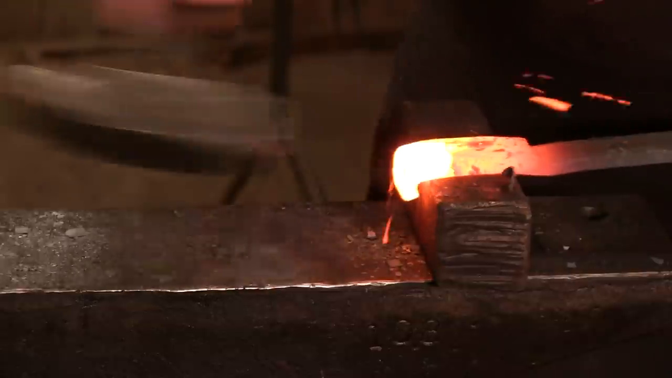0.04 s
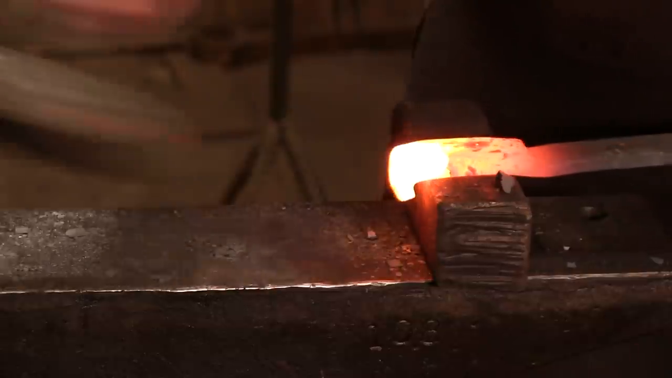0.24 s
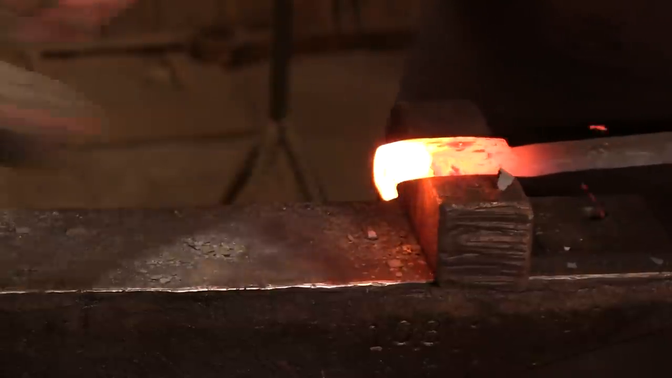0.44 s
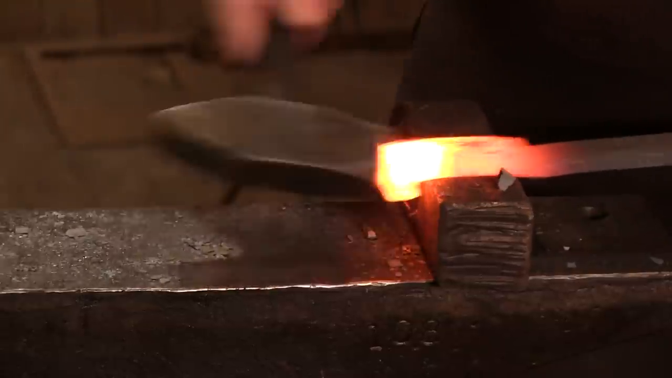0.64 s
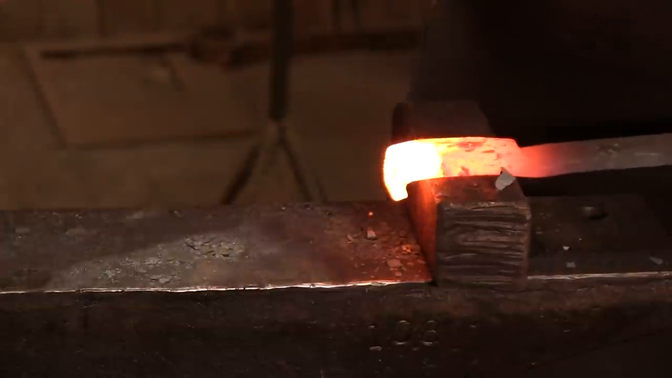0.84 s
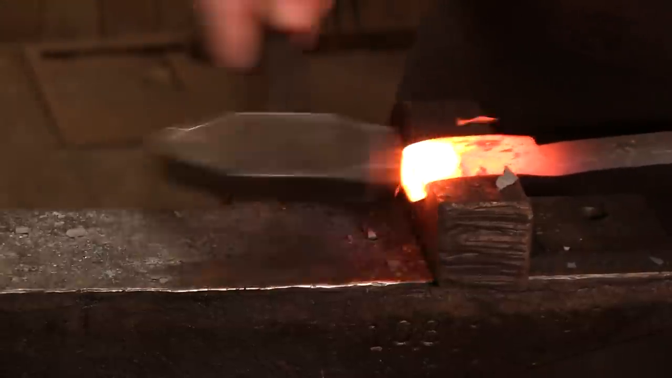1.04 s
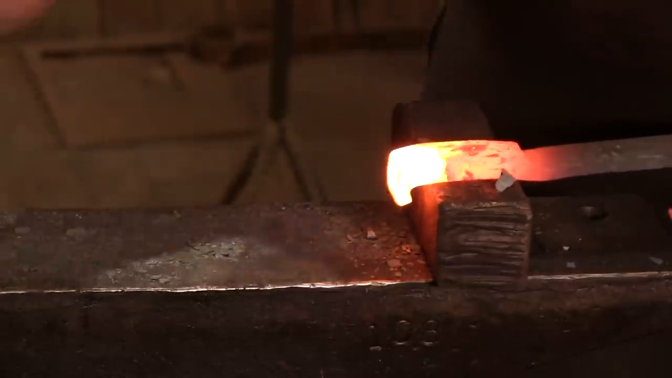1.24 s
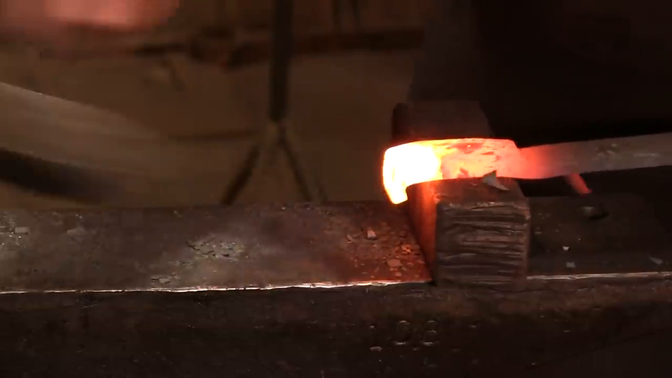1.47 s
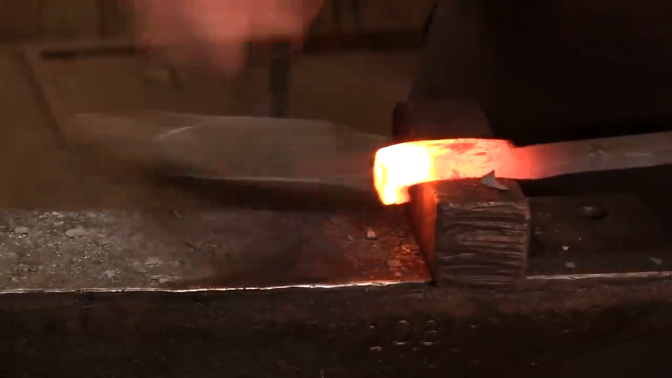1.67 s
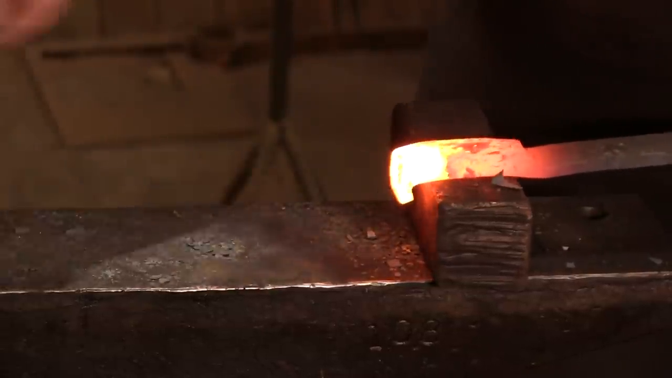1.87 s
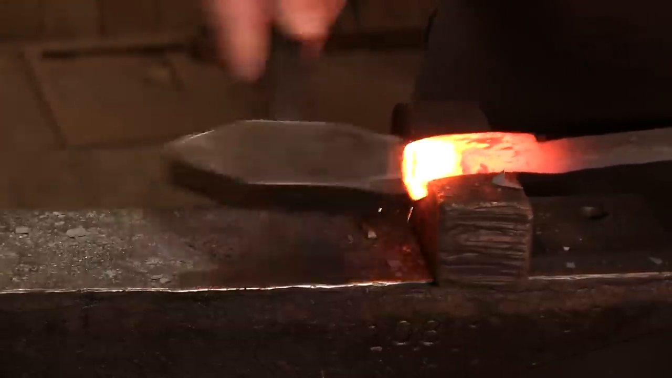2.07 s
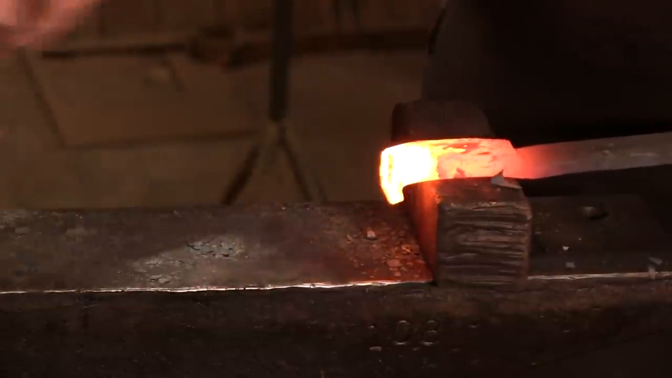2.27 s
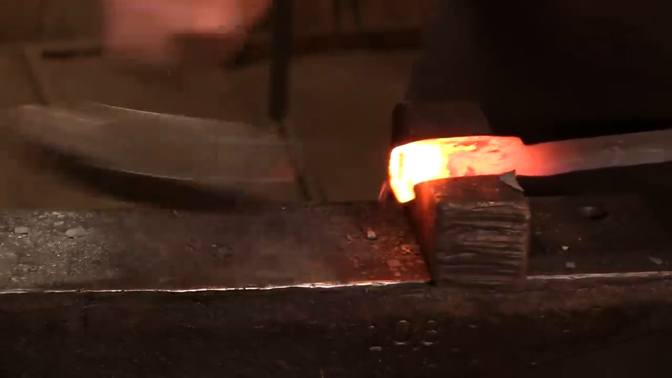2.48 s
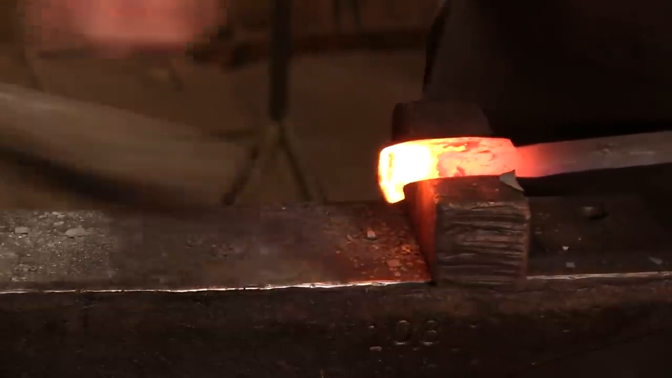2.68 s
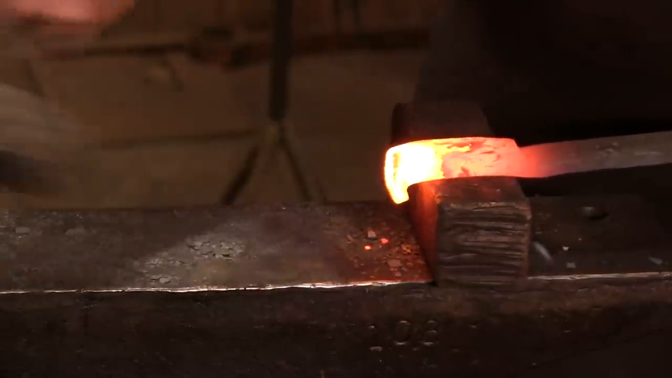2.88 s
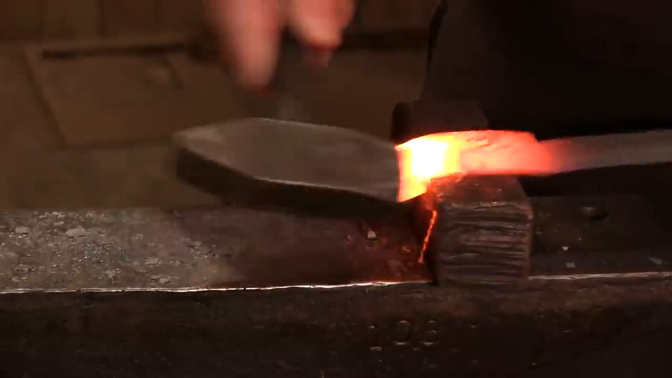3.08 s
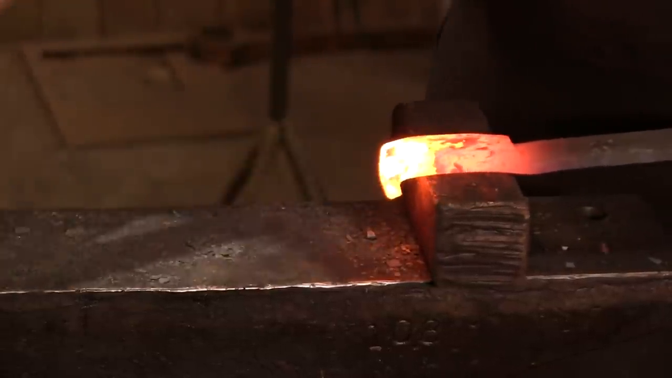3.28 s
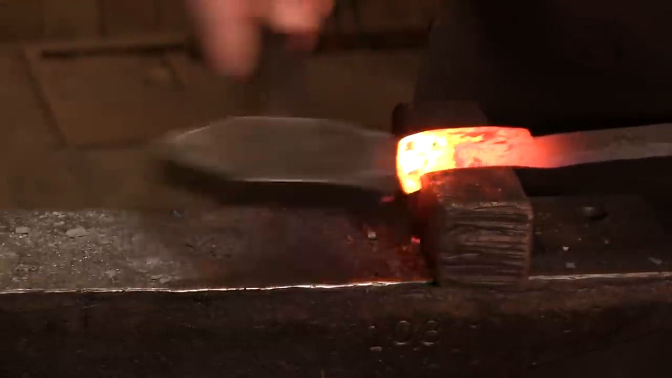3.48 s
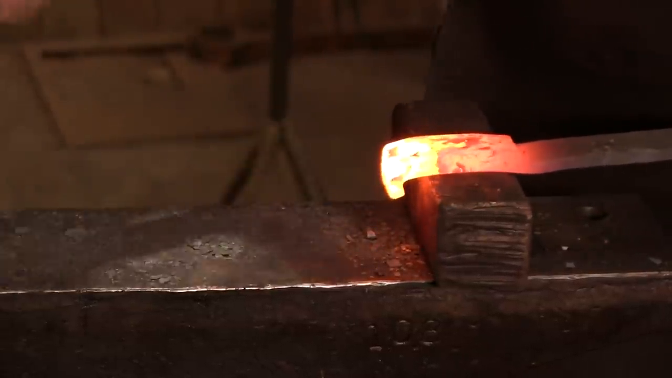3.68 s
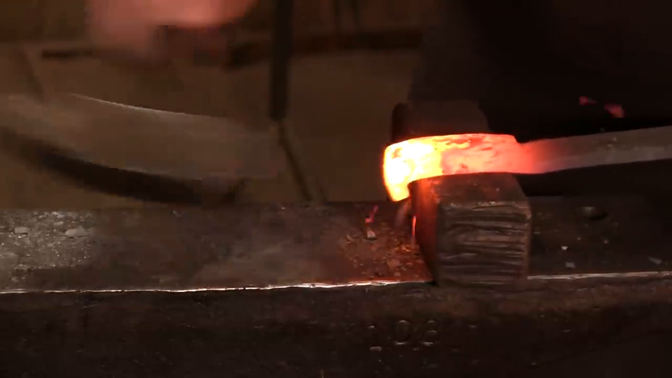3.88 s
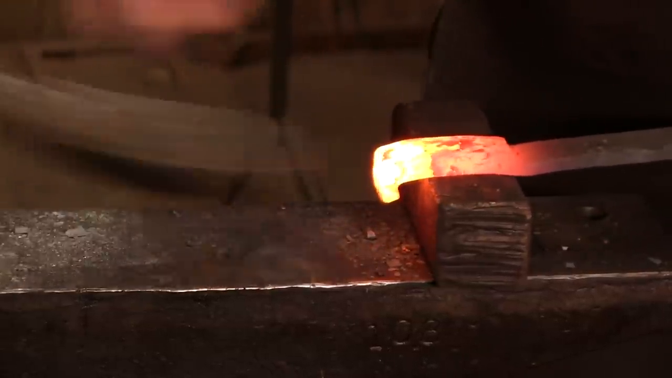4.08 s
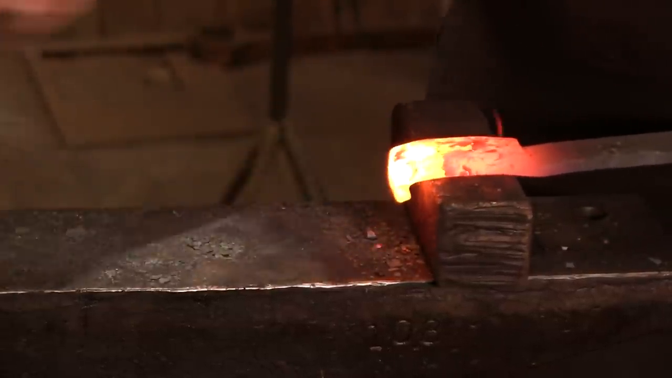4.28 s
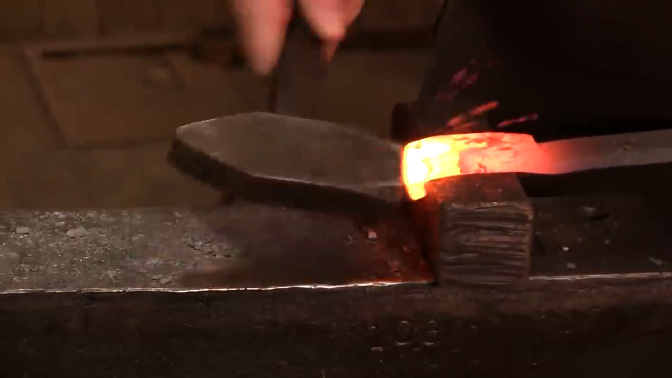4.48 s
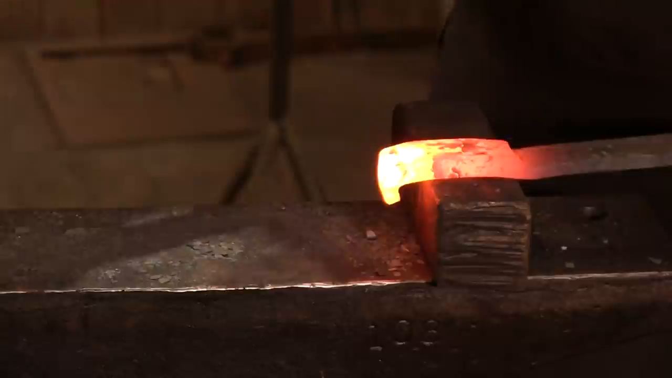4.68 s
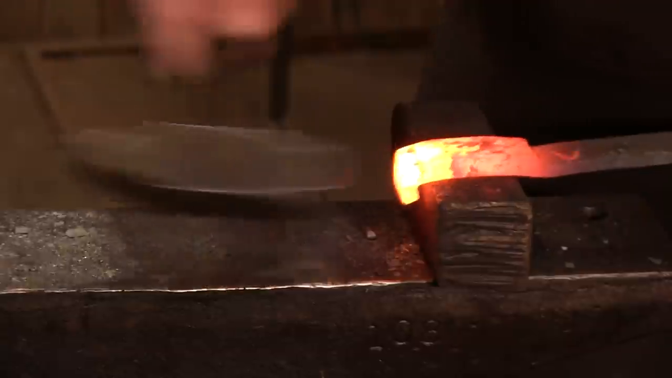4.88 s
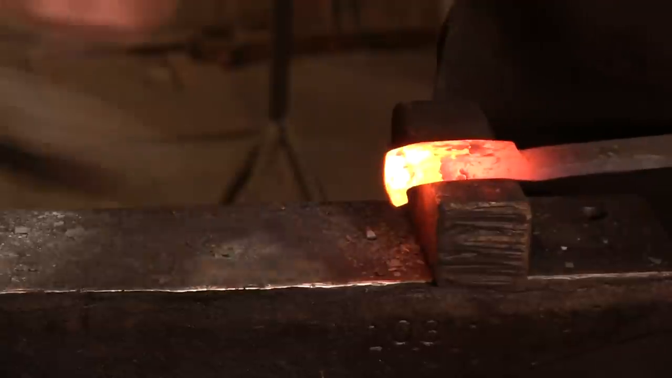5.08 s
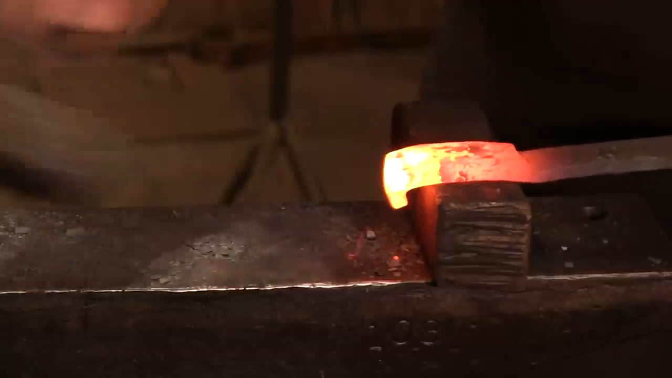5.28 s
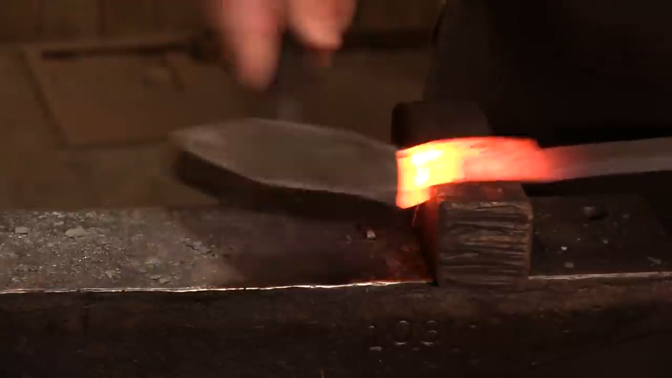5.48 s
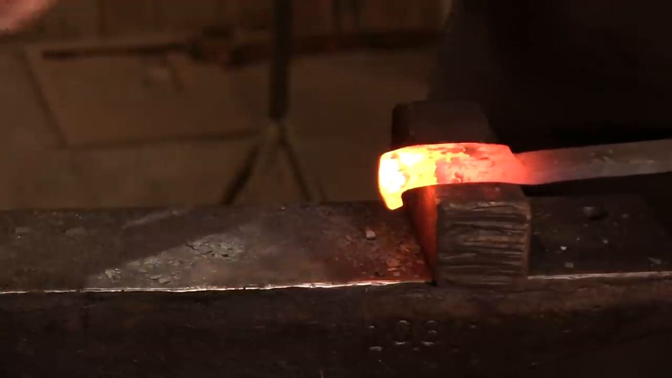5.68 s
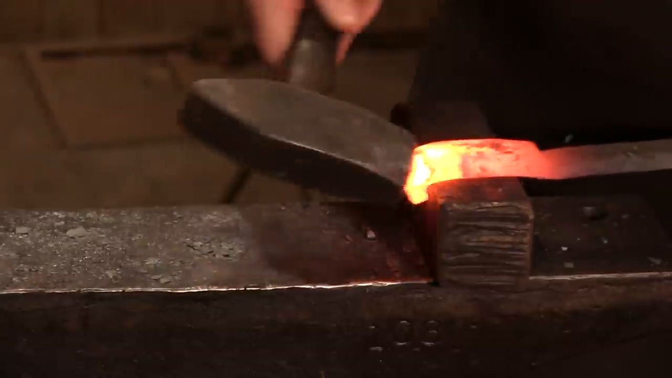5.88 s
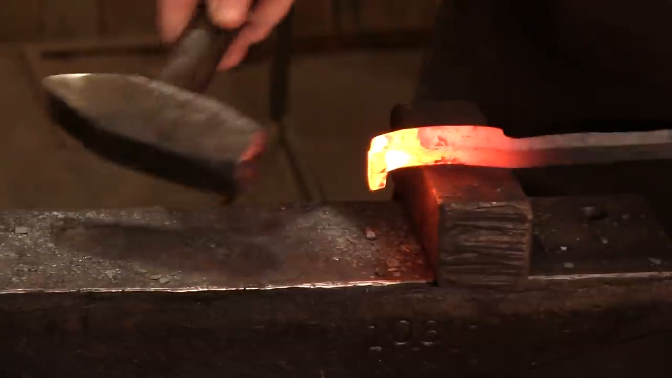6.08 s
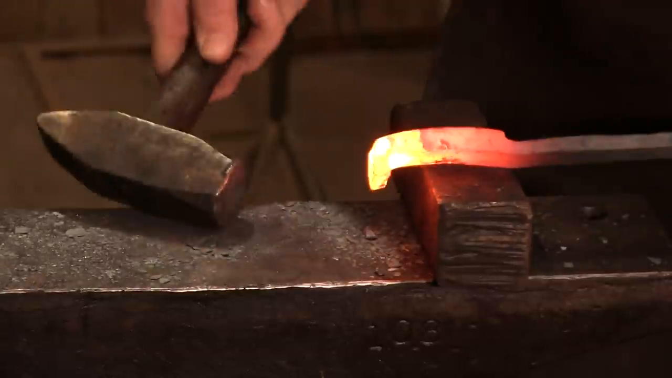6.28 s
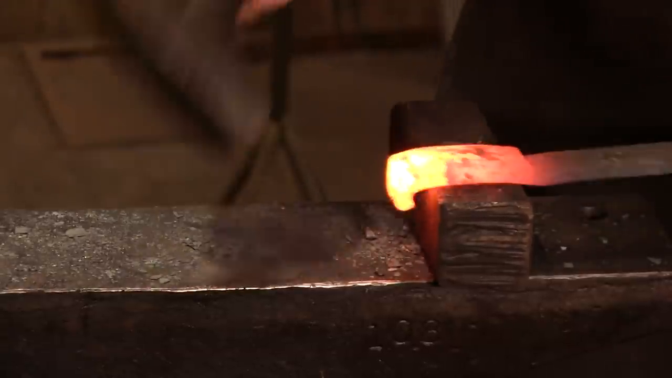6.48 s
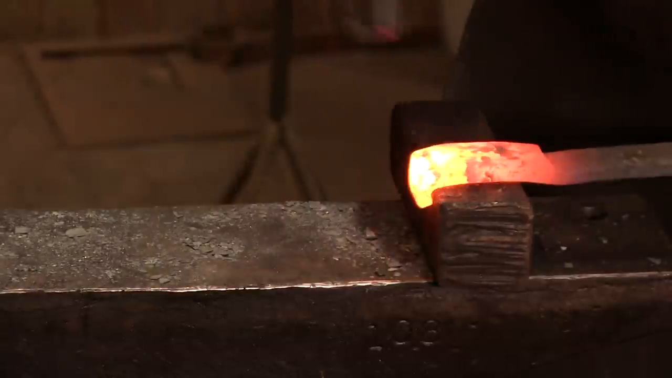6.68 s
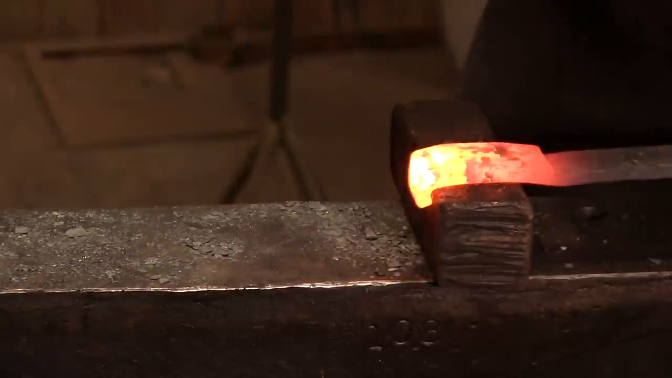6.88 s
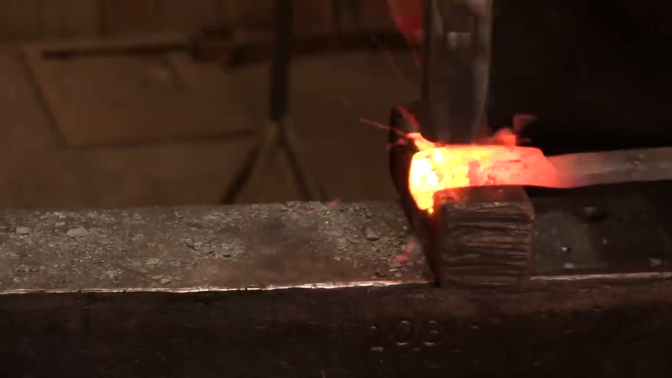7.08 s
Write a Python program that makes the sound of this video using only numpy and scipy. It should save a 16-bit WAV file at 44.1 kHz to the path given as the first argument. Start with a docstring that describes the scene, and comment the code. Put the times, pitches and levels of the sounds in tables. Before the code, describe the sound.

Close, sharp metallic hammer blows fall about three a second in a small workshop, short-ringing and thudding, ending in soft clinks and a gritty drag.

```python
"""Eighteen even hammer blows: a smith upsets a red-hot bar on an anvil in a small workshop.
Each blow is shaped noise for the crack, with damped swings for the anvil's thump and its rocking stand.
Wavering sine modes ring as steel and hammer head; decaying coloured noise answers as the room.
The bar slides and chinks between blows, as modes fed by friction and short bands of noise.
At the end the hammer touches the anvil and the bar drags over scale; a soft draught of noise runs throughout."""
import sys
import numpy as np
from scipy import signal
from scipy.fft import rfft, irfft, next_fast_len
from scipy.io import wavfile

SR = 44100
rng = np.random.default_rng(int(sys.argv[2]) if len(sys.argv) > 2 else 0)


def put_to_file(sound):
    """Save the sound as 16-bit audio at rate SR, in the file named by the first command-line argument."""
    columns = np.atleast_2d(sound).T  # one column per channel
    safe = np.clip(columns, -1, 1)
    whole_steps = np.round(safe * 32767)
    wavfile.write(sys.argv[1], SR, whole_steps.astype(np.int16))


N = 314874
AGE = np.arange(SR // 2) / SR  # s since a contact
TIME = np.arange(N) / SR  # s since the start

# draught spectrum, relative density: f/Hz, level/dB
AIR_COLOUR = [(20, -1), (45, -2), (130, -9), (240, -13), (450, -16), (900, -21), (1800, -24), (3200, -29.5),
              (6500, -32), (9000, -34.5), (12000, -35), (16000, -36)]
# hammer blows; a square one is bright and drives the anvil down, a glancing one is dull; scale sizzles:
# t/s, strength/dB, brightness/dB, sizzle/dB, thump/dB, all relative to the ordinary levels below
HAMMER_BLOWS = [(0.0323, -3.5, -3.5, 2, -20), (0.3823, 0.5, -2, 4.5, -7), (0.7264, 0.5, -3.5, 4.5, -15),
                (1.0794, 1, 4, 5, 7.5), (1.4308, 1.5, 5, -0.5, 7.5), (1.782, 0.5, 3.5, 1.5, 2.5),
                (2.1267, 4, 7, -2, 7.5), (2.4653, 2.5, 10.5, -4, 10.5), (2.813, 2, 7.5, -4.5, 4.5),
                (3.1624, -4.5, -2.5, 3, -14), (3.5165, 0.5, 0.5, 2, -14), (3.8625, 0, 2.5, 1, 6.5),
                (4.2019, -1, 0.5, -4, -0.5), (4.5408, 1.5, 4.5, -3, -0.5), (4.893, -0.5, 1.5, 4.5, 11),
                (5.2289, -2.5, 3, -7.5, 8), (5.5637, -0.5, 0, -2.5, -10), (5.9186, 0, -0.5, 1, -14)]
# spectrum of the crack, relative density: f/Hz, level/dB
CRACK_COLOUR = [(150, -8), (400, -13), (800, -1), (1400, -2), (2050, -4), (2700, -4.5), (3200, -2.5),
                (4100, -0.5), (5400, -0.5), (6700, 3.5), (8300, -8.5), (11200, -3), (12800, -11.5),
                (16000, -17.5)]
# heavily damped modes of hammer, bar and block pressed together: f/Hz, level/dB, t60/s
CONTACT_MODES = [(896, 1, 0.0059), (2017, 0.5, 0.011), (4950, -16.5, 0.029), (6380, -31, 0.012)]
# spectrum of the room's answer, relative density: f/Hz, level/dB
ROOM_COLOUR = [(120, -8.5), (230, -9), (400, 3), (550, -1.5), (950, 0), (1250, -6), (1700, -3), (4200, -3),
               (5800, -1), (6700, 4.5), (7900, -3.5), (11300, -5.5), (12500, -9.5), (16000, -13)]
# modes of the struck bar and anvil, before scatter: f/Hz
STEEL_MODES_HZ = [412, 1065, 1512, 1585, 3590, 4760, 4810, 6612, 7000, 10768, 10862, 11405, 11538, 14120,
                  14490, 14675]
# ring of each of those modes, before scatter: level/dB, t60/s
STEEL_RING = [(-49, 0.49), (-51.5, 0.44), (-46.5, 0.41), (-46, 0.31), (-50, 0.63), (-50, 0.13), (-40, 0.27),
              (-50.5, 0.42), (-64, .3), (-51, 0.68), (-59, 0.38), (-70, 0.38), (-42.5, 0.38), (-44.5, 0.41),
              (-56, .3), (-52.5, 0.49)]
# modes of the hammer head: f/Hz
HEAD_MODES_HZ = [782, 960, 1517, 1825, 3259, 4080, 5152, 13300]
# ring of each head mode, relative: level on a light touch/dB, level on a full blow/dB, t60/s
HEAD_RING = [(-12, 0, .1), (-5, -31.5, 0.081), (-12, 7, 0.12), (-9.5, 6, 0.15), (-2, -1, 0.34),
             (-21, -4.5, .14), (-27, 0.5, 0.47), (-33, -12, .33)]
# modes the bar sings with when it slides or chinks: f/Hz, relative level/dB, t60/s
BAR_MODES = [(6615, 0, .22), (10770, -4, .48), (10862, 0, .42), (11410, -6, .2), (11545, -9, .25)]
# single slides and chinks of the bar, short and long, beside the slide after each blow:
# t/s, length/s, level/dB, lowest mode/dB, upper pair/dB
BAR_SLIDES = [(.79, 0.082, -50.5, -1, -6), (1.537, 0.044, -41.5, -3, -2), (1.578, 0.069, -50, 12, -3),
              (2.863, 0.033, -48.5, -11, 7), (4.265, 0.05, -41, -6, -1), (6.027, 0.031, -62.5, 10, -13),
              (6.815, 0.0031, -43.5, 3, 1)]
# light knocks and scuffs of steel and scale: t/s, level/dB, t60/s, centre f/Hz
LIGHT_KNOCKS = [(1.451, -23.5, 0.022, 1310), (2.157, -39, 0.015, 1500), (3.075, -50, 0.2, 199),
                (3.212, -34, 0.032, 9100), (4.72, -42.5, 0.23, 243), (5.945, -30, 0.022, 1300),
                (5.984, -31, 0.066, 3500), (6.109, -43.5, 0.071, 876), (6.528, -45.5, 0.035, 6260),
                (6.662, -43.5, 0.086, 910), (6.818, -49.5, 0.054, 2480), (7.037, -45.5, 0.025, 6100)]
# the block chatters on the anvil after a hard blow: t/s, level/dB, t60/s
BLOCK_CHATTER = [(2.52, -37, 0.27), (2.828, -26, 0.17)]
# the hammer head touches the anvil, on the last rebound and when set down: t/s, level/dB, hardness/0-1
HEAD_TOUCHES = [(5.942, -44.5, 1), (6.3058, -40.5, 0.03)]

AIR_DB, AIR_WANDER_DB, AIR_WANDER_HZ = -51.5, .7, 1.2  # mean level and slow wander
CRACK_DB, THUMP_DB, ROOM_DB, ROCK_DB = -11.5, -16.5, -25.5, -27  # levels of an ordinary blow
ROOM_FOLLOWS = .65  # dB of room for each dB of strength
SHARED = .52  # share of the room's power shaped by the same modes at every blow
CLANG_DB, CLANG_SCATTER_DB = 0.5, 1.5  # steel resonance; the face never lands on quite the same spot
DETUNE = .0015  # spread, as a share of frequency: steel modes shift with the place of the blow
RING_SCATTER_DB = 3  # spread of every steel mode from blow to blow
HEAD_DB, HEAD_DAMPING = -51.5, 0.66  # head ring at 0 dB of thump, and the dB it loses for each dB of thump
HEAD_BEATING = .35  # the hammer head is close by, so its ring wavers little
FLAKES_PER_S, FLAKE_DB = 14, -56  # scale that flies off and lands; level of the smallest flakes
SPRING_DELAY_S, SPRING_LENGTH_S = 0.089, 0.05  # the bar's slide after every blow
SPRING_DB, SPRING_SCATTER_DB = -58, 5  # some blows set the bar singing, others hardly
SPRING_LOWEST_DB, SPRING_UPPER_DB = -3.5, 5.5  # its lowest mode and its upper pair
# the bar is dragged over loose scale
DRAG_S, DRAG_RISE_S, DRAG_LENGTH_S, DRAG_STOP_S, DRAG_DB = 6.5, .14, 0.504, 0.093, -57.5
TOP_HZ = 15800  # upper limit of the microphone


def undb(db):
    """Decibels to gain."""
    return 10 ** (np.asarray(db) / 20)


def unit(x):
    """Scale to rms 1."""
    return x / np.sqrt(np.mean(x ** 2))


def fade(t60):
    """Exponential decay of a free vibration, down 60 dB after t60 seconds."""
    return np.exp(-np.log(1000) * AGE / t60)


def add(out, s, x):
    """Mix x into out from time s."""
    i = max(int(s * SR), 0)
    out[i:i + len(x)] += x[:len(out) - i]


def colour(x, points, bright_db=0, clang_db=0, sizzle_db=0):
    """Causal filter of unit power through (Hz, dB) points, with treble shelf, steel resonance and top shelf."""
    size = next_fast_len(len(x), True) * 2
    hz = np.maximum(np.fft.rfftfreq(size, 1 / SR), 1)
    at, db = np.transpose(points)
    curve = np.interp(np.log(hz), np.log(at), db)
    treble = bright_db / (1 + (3000 / hz) ** 3)
    top = sizzle_db / (1 + (9800 / hz) ** 12)
    clang = clang_db / (1 + ((hz - 6650) / 700) ** 2)
    gain = unit(undb(curve + treble + top + clang))
    # fold the cepstrum forward in time for minimum phase, so nothing sounds before the contact
    cepstrum = irfft(np.log(gain))
    cepstrum[1:size // 2] *= 2
    cepstrum[size // 2 + 1:] = 0
    return irfft(rfft(x, size) * np.exp(rfft(cepstrum)))[:len(x)]


def band(x, hz, spread):
    """Broad resonance from hz / spread to hz * spread, its top held below the Nyquist limit."""
    edges = [hz / spread, min(hz * spread, SR / 2 - 2000)]
    return signal.sosfilt(signal.butter(1, edges, "band", fs=SR, output="sos"), x)


def walk(rate, size):
    """Random wander with a spread near 1, gliding through rate values a second."""
    steps = np.arange(size) * rate / SR
    return np.interp(steps, np.arange(2048), rng.standard_normal(2048))


def partial(hz, beating):
    """One mode; reflections from the walls make it beat irregularly."""
    phase = 2 * np.pi * (hz * AGE + rng.random())
    direct = (1 + beating * walk(75, len(AGE))) * np.sin(phase)
    reflected = beating * walk(70.4, len(AGE)) * np.cos(phase)
    return unit(direct + reflected)


def noise():
    """White noise as long as one contact."""
    return rng.standard_normal(len(AGE))


def draught():
    """A low, fluttering rush of air and fire under a steadier hiss, both wandering slowly in level."""
    x = unit(colour(rng.standard_normal(N), AIR_COLOUR))
    rush = signal.sosfiltfilt(signal.butter(2, 500, fs=SR, output="sos"), x)
    hiss = x - rush
    flutter = undb(2 * walk(22, N))
    level = undb(AIR_DB + AIR_WANDER_DB * walk(AIR_WANDER_HZ, N))
    return (rush * flutter + hiss) * level


def crack(tone, contact_s=0.0018, die_s=0.0016, near_db=-16, near_t60=0.069, cushion=0.65):
    """The face stops dead and scale shatters under it; nearby surfaces return the crack at once."""
    force = np.exp(-np.maximum(AGE - contact_s, 0) / die_s)
    nearby = undb(near_db) * fade(near_t60)
    x = colour(np.sign(noise()) * (force + nearby), CRACK_COLOUR, *tone)
    shatter = x / np.sqrt(np.mean(x[:SR // 200] ** 2))  # rms 1 over the first 5 ms
    body = sum(undb(db) * np.sin(2 * np.pi * hz * AGE) * fade(t60) for hz, db, t60 in CONTACT_MODES)
    # a bright, hard contact leaves less for the dull body of the knock
    return shatter - undb(-cushion * tone[0]) * body


def thump(hz=130, t60=0.012, push_hz=60, push_t60=0.043, push=0.31):
    """The anvil is driven down into its stand: a suction, then one damped swing."""
    suction = -np.cos(2 * np.pi * hz * AGE + 0.2) * fade(t60)
    swing = push * np.sin(2 * np.pi * push_hz * AGE) * fade(push_t60)
    return suction + swing


def rocking(hz=26, t60=0.65, rise_s=0.12):
    """The stand rocks slowly on the floor after a blow, never twice at quite the same rate."""
    rate = hz * (1 + .1 * rng.standard_normal())
    return np.sin(2 * np.pi * rate * AGE) * fade(t60) * (1 - np.exp(-AGE / rise_s))


def workshop(walls, tone, t60=0.49, treble_t60=0.32, onset_s=0.00083):
    """Lumpy reflections: the same room modes stand out each blow over a diffuse wash; treble dies first."""
    modal = unit(signal.fftconvolve(walls, noise() * fade(.03))[:len(AGE)])
    wash = np.sqrt(SHARED) * modal + np.sqrt(1 - SHARED) * noise()
    x = unit(colour(wash, ROOM_COLOUR, *tone))
    low = signal.sosfiltfilt(signal.butter(2, 8000, fs=SR, output="sos"), x)
    treble = x - low
    lumps = undb(1.5 * walk(250, len(AGE)))
    return (1 - np.exp(-AGE / onset_s)) * lumps * (low * fade(t60) + treble * fade(treble_t60))


def steel_ring():
    """Bar and anvil ring on in their own modes, each a little off in pitch and level at every blow."""
    out = np.zeros(len(AGE))
    for hz, (db, t60) in zip(STEEL_MODES_HZ, STEEL_RING):
        ring = partial(hz * (1 + DETUNE * rng.standard_normal()), 2.3)
        out += undb(db + RING_SCATTER_DB * rng.standard_normal()) * ring * fade(t60)
    return out


def head_ring(hardness):
    """Modes of the hammer head; hardness 0-1 moves their balance from a light touch to a full blow."""
    out = np.zeros(len(AGE))
    for hz, (light_db, full_db, t60) in zip(HEAD_MODES_HZ, HEAD_RING):
        db = np.interp(hardness, [0, 1], [light_db, full_db])
        out += undb(db) * partial(hz, HEAD_BEATING) * fade(t60)
    return out


def rattle(level_db=-32, t60=0.0088, count=7, rebound_db=-28, rebound_hz=850, rebound_t60=0.022):
    """The bar slaps back on the block; loose scale and tools jump and land just after."""
    out = np.zeros(len(AGE))
    slap = unit(band(band(noise(), rebound_hz, 1.7), rebound_hz, 1.7)) * fade(rebound_t60)
    add(out, rng.uniform(.02, .038), undb(rebound_db) * slap)
    for when, size, pitch in rng.random((count, 3)):
        landing = unit(band(noise(), 600 * 8 ** pitch, 1.3)) * fade(t60)
        add(out, .012 + .13 * when, undb(level_db + 8 * size) * landing)
    return out * fade(0.75)  # later landings are softer


def blows():
    """Each blow cracks, thumps, rings the steel and fills the room; a glancing one leaves the hammer ringing."""
    out, walls = np.zeros(N), noise()
    for s, strength_db, bright_db, sizzle_db, thump_db in HAMMER_BLOWS:
        tone = bright_db, CLANG_DB + CLANG_SCATTER_DB * rng.standard_normal(), sizzle_db
        add(out, s, undb(CRACK_DB + strength_db) * crack(tone))
        add(out, s, undb(THUMP_DB + thump_db) * thump())
        add(out, s, undb(ROOM_DB + ROOM_FOLLOWS * strength_db) * workshop(walls, tone))
        add(out, s, undb(ROCK_DB) * rocking())
        add(out, s, rattle())
        add(out, s, steel_ring())
        add(out, s, undb(HEAD_DB - HEAD_DAMPING * thump_db) * head_ring(1))
    return out


def flakes(hz=9000, t60=0.011):
    """Bits of scale tick faintly at random moments as they land on the anvil."""
    out = np.zeros(N)
    for when, size in rng.random((int(FLAKES_PER_S * N / SR), 2)):
        tick = unit(band(noise(), hz, 3.4)) * fade(t60)
        add(out, when * N / SR, undb(FLAKE_DB + 10 * size) * tick)
    return out


def slides():
    """Friction feeds the bar's modes while it moves; then they ring out."""
    out = np.zeros(N)
    springs = []
    for s, *_ in HAMMER_BLOWS:
        level_db = SPRING_DB + SPRING_SCATTER_DB * rng.standard_normal()
        springs.append((s + SPRING_DELAY_S, SPRING_LENGTH_S, level_db, SPRING_LOWEST_DB, SPRING_UPPER_DB))
    for s, length, level_db, lowest_db, upper_db in [*springs, *BAR_SLIDES]:
        for hz, db, t60 in BAR_MODES:
            build = 1 - np.exp(-3 * AGE / length)
            ring_out = np.exp(-np.log(1000) * np.maximum(AGE - length, 0) / t60)
            share_db = lowest_db if hz < 8000 else upper_db if hz > 11100 else 0
            add(out, s, undb(level_db + db + share_db) * build * ring_out * partial(hz, 0.44))
    return out


def knocks(room_db=-19):
    """Light contacts of steel and scale: short bands of noise with a little room behind."""
    out = np.zeros(N)
    for s, db, t60, hz in LIGHT_KNOCKS:
        decay = fade(t60) + undb(room_db) * fade(0.48)
        add(out, s, undb(db) * unit(band(noise(), hz, 1.54)) * decay)
    return out


def chatter(rise_s=0.0095):
    """A loose block keeps feeding the two steel modes near 1.5 kHz, so they swell and waver."""
    out = np.zeros(N)
    for s, db, t60 in BLOCK_CHATTER:
        ring = partial(STEEL_MODES_HZ[2], 0.86) + .5 * partial(STEEL_MODES_HZ[3], 0.69)
        add(out, s, undb(db) * ring * (1 - np.exp(-AGE / rise_s)) * fade(t60))
    return out


def touches(tick_db=9):
    """The hammer head ticks on the anvil and rings; a harder touch wakes its higher modes."""
    out = np.zeros(N)
    for s, level_db, hardness in HEAD_TOUCHES:
        contact = unit(band(band(band(noise(), 2440, 1.36), 2200, 1.45), 2100, 2.5))
        tick = contact * (fade(0.017) + undb(-25.0) * fade(0.87))
        add(out, s, undb(level_db) * (undb(tick_db) * tick + head_ring(hardness)))
    return out


def drag():
    """Flakes of scale grind under the bar as it moves in small jerks."""
    jerks = undb(4 * walk(260, N) + 2.5 * walk(30, N))
    start = (TIME - DRAG_S) / DRAG_RISE_S
    stop = 1 - (TIME - DRAG_S - DRAG_LENGTH_S) / DRAG_STOP_S
    moving = np.clip(np.minimum(start, stop), 0, 1)
    grind = unit(band(rng.standard_normal(N) * jerks, 5700, 5.9))
    return grind * moving * undb(DRAG_DB)


def scene():
    """Everything at one microphone beside the anvil."""
    return (draught() + blows() + flakes() + slides() + knocks() + chatter() + touches() + drag())[None]


def record(dry, ceiling=0.92):
    """The microphone sheds the deepest bass, loud peaks overload it softly, and the top is cut."""
    x = signal.sosfilt(signal.butter(2, 18, "high", fs=SR, output="sos"), dry)
    overloaded = ceiling * np.tanh(x / ceiling)
    return signal.sosfilt(signal.ellip(8, .2, 75, TOP_HZ, fs=SR, output="sos"), overloaded)


dry = scene()
out = record(dry)
put_to_file(out)
```